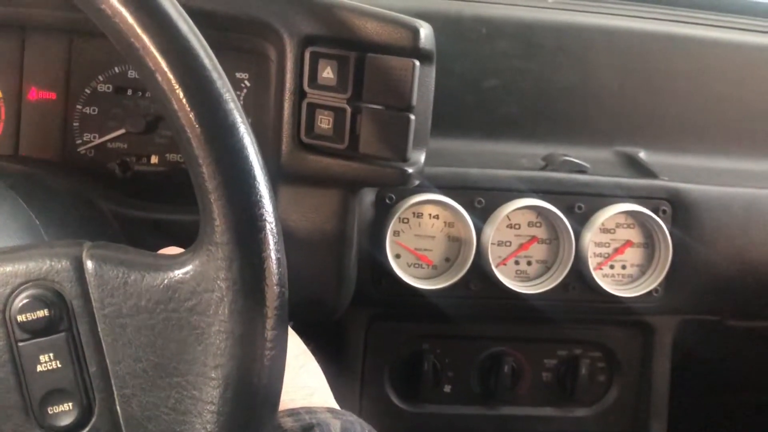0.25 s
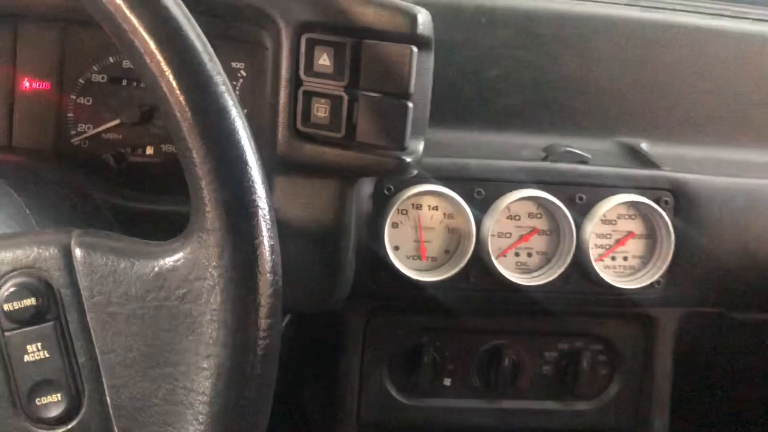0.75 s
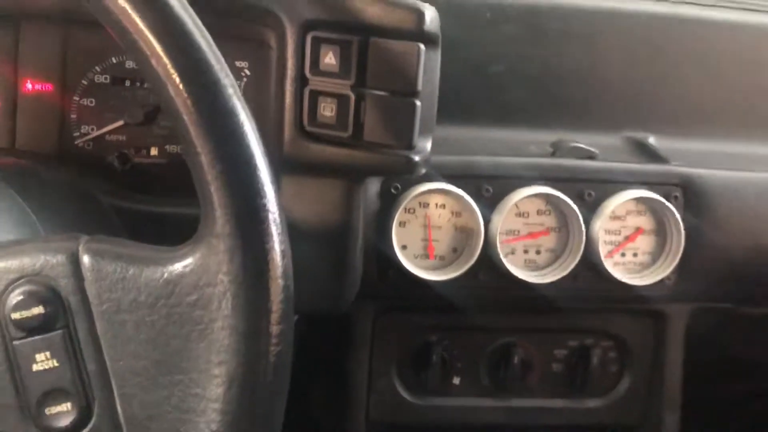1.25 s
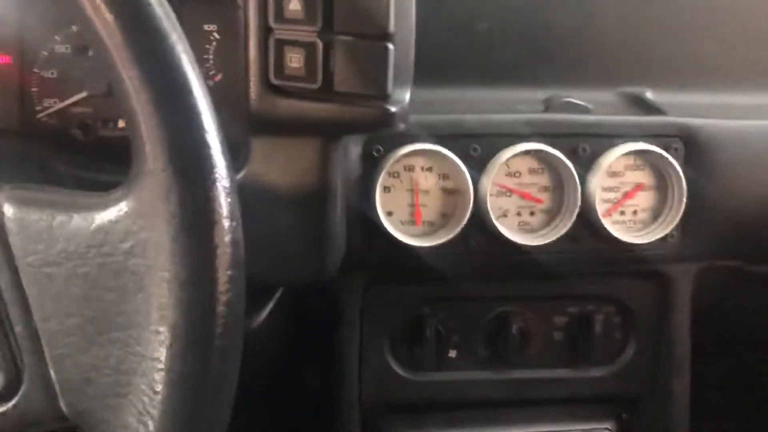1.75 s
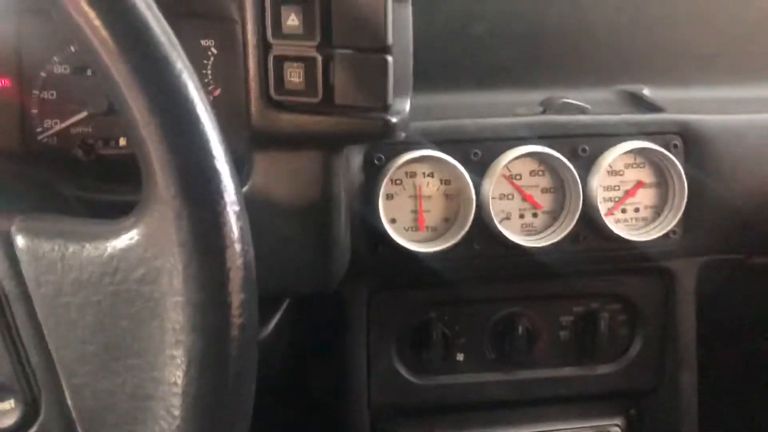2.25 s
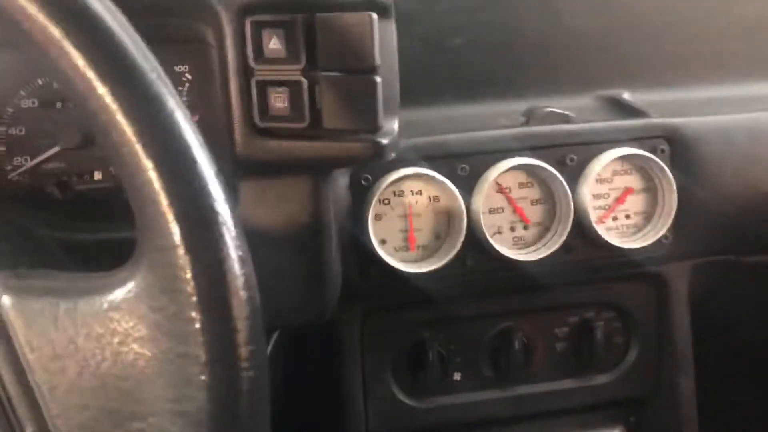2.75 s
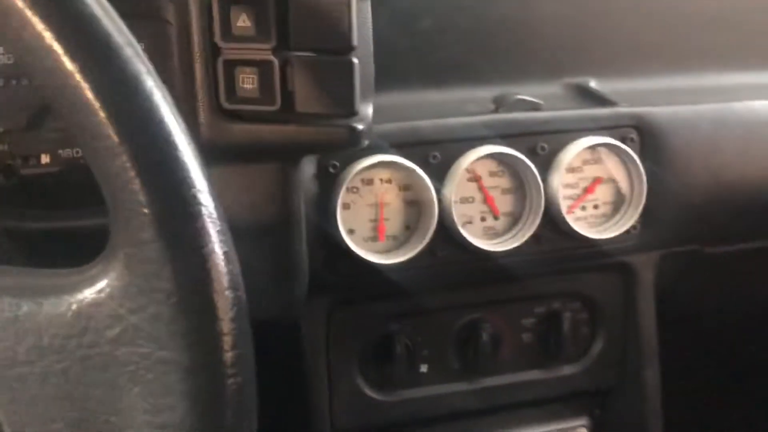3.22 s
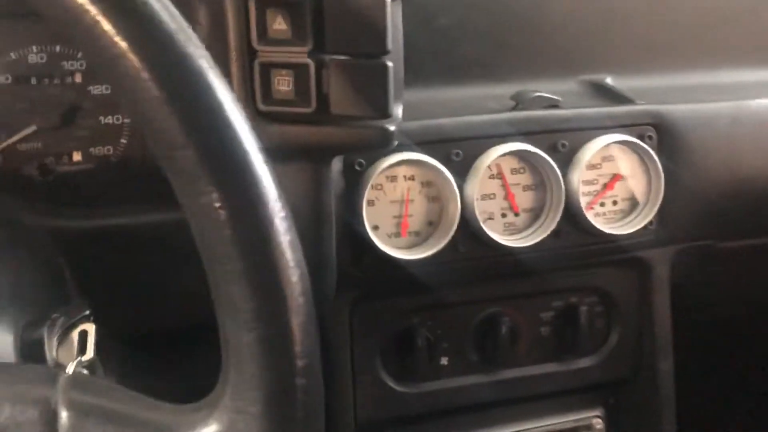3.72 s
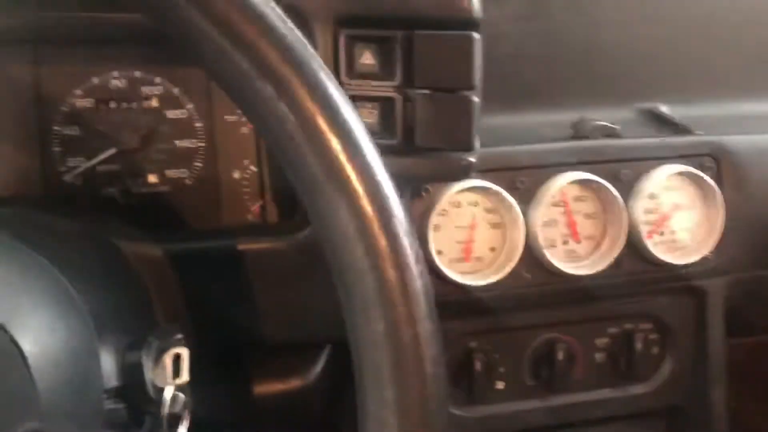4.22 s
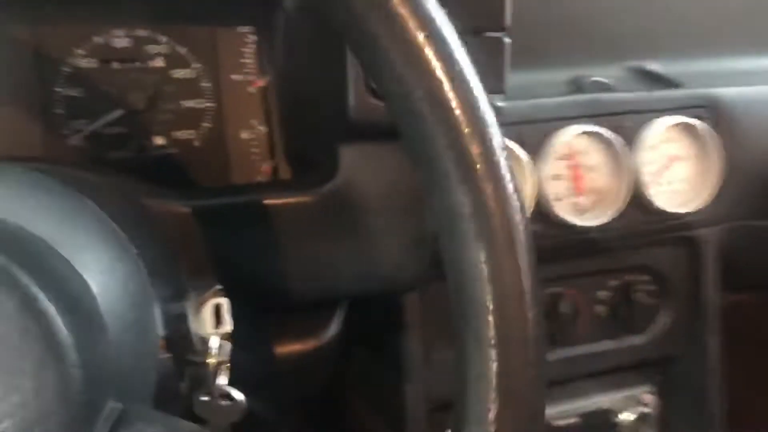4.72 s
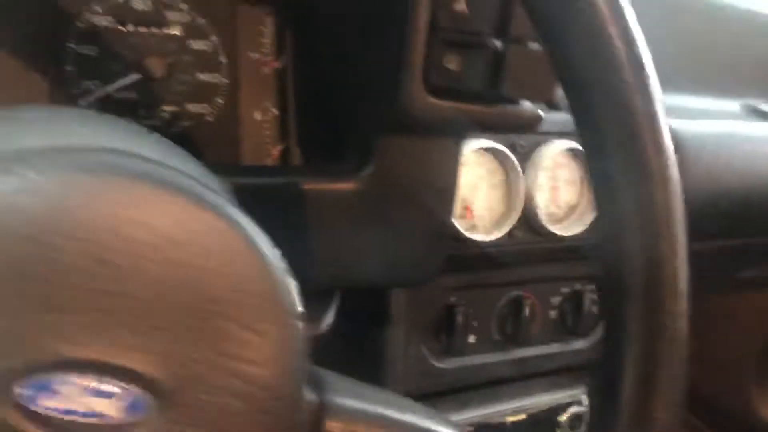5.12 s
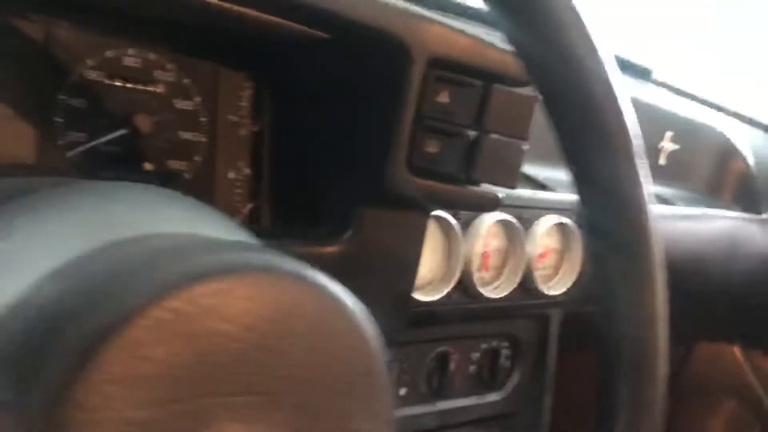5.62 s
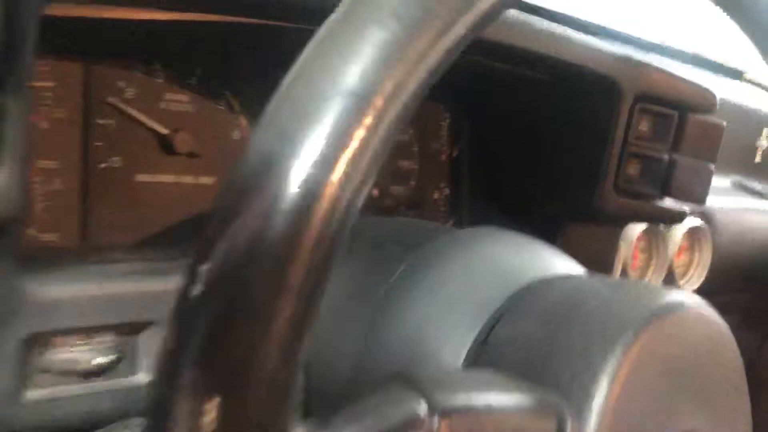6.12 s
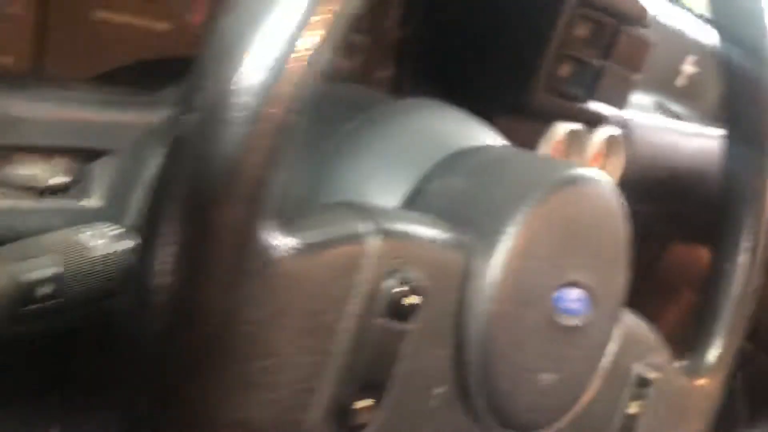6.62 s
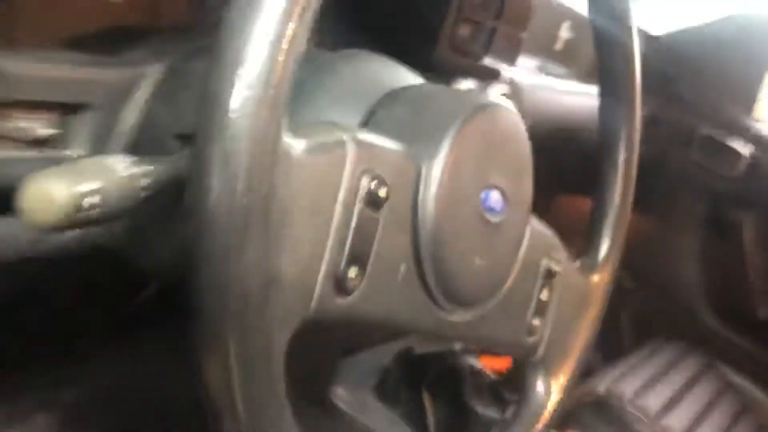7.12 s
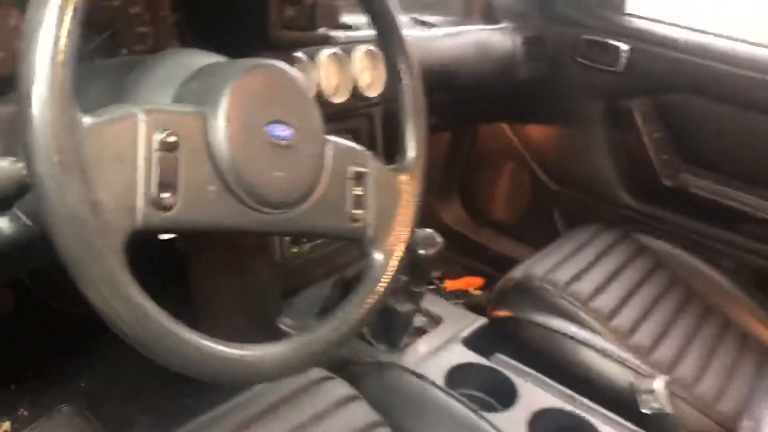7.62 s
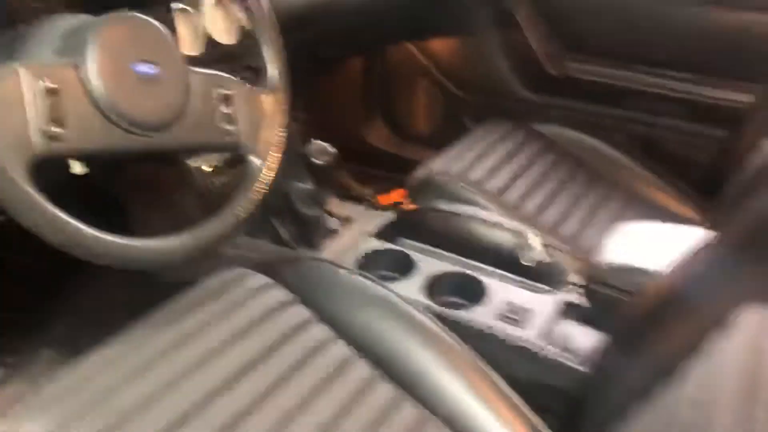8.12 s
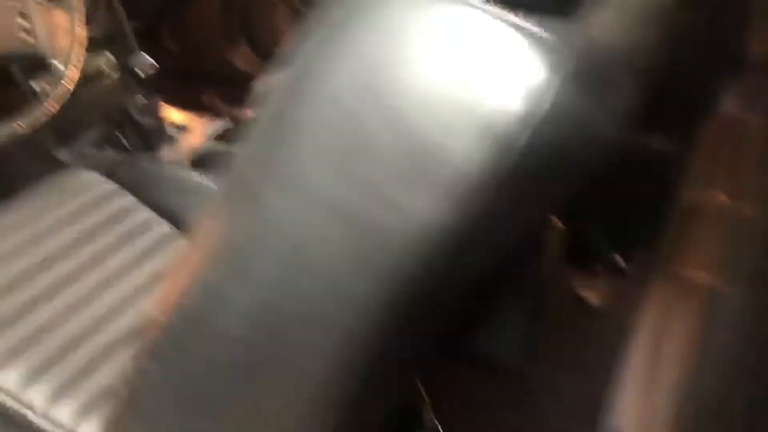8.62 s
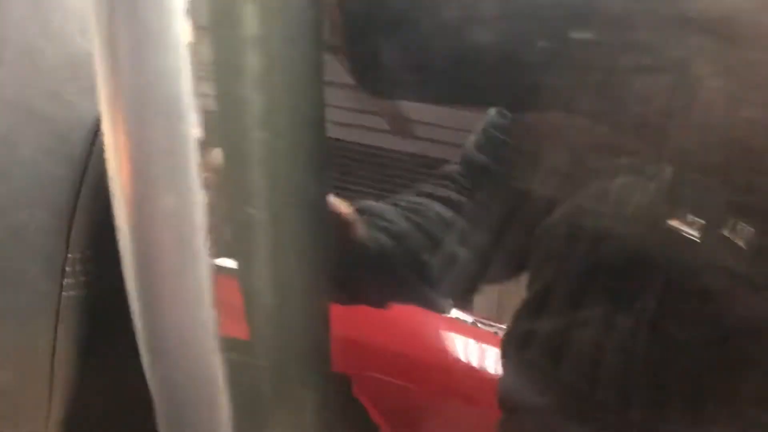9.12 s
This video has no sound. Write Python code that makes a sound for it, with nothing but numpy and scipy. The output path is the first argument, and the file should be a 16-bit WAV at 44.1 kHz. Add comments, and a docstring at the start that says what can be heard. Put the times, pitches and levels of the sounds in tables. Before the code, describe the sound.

Heard from the driver's seat in a garage: a very short starter whine and gear grind, then a V8 catches with rough explosions, flares loudly and falls to a throbbing open-exhaust idle. Engine ticks and hisses. Keys clink once, trim knocks, and the boom swells as the handheld microphone backs out of the door, with soft bumps and cloth rustle; the idle sags at the end.

```python
"""In a garage, a cold V8 with an open exhaust is started, heard from the driver's seat.
The starter motor hums and whines, then the engine catches, flares up and settles into a loping idle.
The keys clink once, then the listener backs out through the open door, past standing waves of the note.
The exhaust mixes a steady note with uneven firings that ring in resonances; the engine bay ticks and hisses.
Loose trim knocks, the body bumps softly and clothes rustle: short bursts of shaped noise."""
import sys
import numpy as np
from scipy import signal
from scipy.fft import rfft, irfft
from scipy.io import wavfile
from scipy.ndimage import uniform_filter1d

SR = 44100
rng = np.random.default_rng(int(sys.argv[2]) if len(sys.argv) > 2 else 0)


def store_pcm(level_fs):
    """Save levels as 16-bit WAV."""
    pcm = np.round(np.clip(level_fs, -1, 1) * 32767).astype(np.int16)
    wavfile.write(sys.argv[1], SR, np.atleast_2d(pcm).T)


N = 412335
TIME = np.arange(N) / SR  # s


def from_db(db):
    """Turns decibels into a factor on the sound pressure."""
    return 10 ** (np.asarray(db) / 20)


def rms_one(x):
    """Scales a sound to an average strength (rms) of 1."""
    return x / np.sqrt(np.mean(x ** 2) + 1e-20)


def in_time(rows):
    """Joins the points of each column by straight lines, giving one curve per column."""
    s, *columns = np.transpose(rows)
    return [np.interp(TIME, s, column) for column in columns]


def evened(x, size=3400):
    """Holds the rms near 1 over a window of size samples; faster throbs stay."""
    power = uniform_filter1d(x ** 2, size=2 * size)
    power = uniform_filter1d(power, size=size)
    return x / np.sqrt(np.abs(power) + 1e-12)


def blend(a, b, share):
    """Mixes a with the given share (0-1) of the power of b."""
    share = np.clip(share, 0, 1)
    return np.sqrt(1 - share) * a + np.sqrt(share) * b


def cut(x, hz, kind, order=4):
    """Removes the pitches outside the wanted range with a smooth filter."""
    return signal.sosfilt(signal.butter(order, hz, kind, fs=SR, output="sos"), x)


def drift(rate):
    """Slow random wandering with spread 1, aiming for rate new values per second."""
    knots = rng.standard_normal(4000)
    return rms_one(np.interp(TIME * rate, np.arange(len(knots)), knots))


def coloured(x, spectrum):
    """Shapes a sound by (pitch_hz, level_db) points, falling steeply below the first; rms 1."""
    hz, db = np.transpose(spectrum)
    f = np.arange(N // 2 + 1) * SR / N + 1
    gain = from_db(np.interp(np.log(f), np.log(hz), db))
    gain = gain * np.minimum(f / hz[0], 1) ** 4
    return rms_one(irfft(rfft(x) * gain, N))


def resonate(x, modes):
    """Lets a sound ring in side-by-side resonances (pitch_hz, width_hz, level_db) of alternating sign."""
    out = 0
    for k, (hz, width, db) in enumerate(modes):
        r = np.exp(-np.pi * width / SR)  # a wider resonance dies sooner
        poles = [1, -2 * r * np.cos(2 * np.pi * hz / SR), r * r]
        ringing = signal.lfilter([1, 0, -1], poles, x + 1e-18)
        out = out + (-1) ** k * from_db(db) * (1 - r * r) / 2 * ringing
    return out


def narrow(x, hz, width):
    """Passes one resonance twice, for steep flanks and dark valleys."""
    mode = [(hz, width, 0)]
    return resonate(resonate(x, mode), mode)


def garage(x, t60, wet_db):
    """Adds a dense tail of reflections that falls 60 dB in t60 seconds, cut off after half a second."""
    t = TIME[:SR // 2]
    tail = rng.standard_normal(len(t)) * from_db(-60 * t / t60)
    reflections = signal.fftconvolve(x, tail / np.linalg.norm(tail))[:N]
    return x + from_db(wet_db) * reflections


def bursts(events, spectrum):
    """Bursts of shaped noise that start suddenly and die away: (start_s, level_db, decay_s)."""
    envelope = 0
    for s, db, decay in events:
        envelope = envelope + from_db(db) * (TIME >= s) * np.exp(-np.abs(TIME - s) / decay)
    return envelope * coloured(rng.standard_normal(N), spectrum)


def ramp(start_s, length_s):
    """Rises from 0 to 1 and stays there."""
    return np.clip((TIME - start_s) / length_s, 0, 1)


# Where the listener is: time_s, place (0 at the gauges, 1 at the wheel, 2 in the doorway, 3 by the sill)
LISTENER_PLACE = [(0, 0), (3.4, 0), (4.2, 1), (4.9, 1.1), (5.6, 2), (7.0, 2), (8.0, 3), (8.7, 2.8),
                  (9.35, 2)]


def nearness(count=4):
    """Weight (0-1) of each of the four listening places over time."""
    place = np.clip(in_time(LISTENER_PLACE)[0], 0, count - 1)
    return np.maximum(1 - np.abs(place - np.arange(count)[:, None]), 0)


# Engine speed: time_s, firings_per_s
ENGINE_SPEED = [(0, 12), (.2, 90), (.45, 159), (.54, 163), (.63, 158), (.76, 128), (.95, 113), (1.2, 106.9),
                (1.85, 107.7), (2.12, 102), (2.45, 106.5), (2.68, 105.9), (2.85, 104.7), (3.2, 106.5),
                (3.75, 104.9), (4.3, 105.5), (4.95, 107.6), (5.3, 102.7), (5.7, 100.3), (6.15, 101.5),
                (6.6, 100.3), (7.8, 98), (8.3, 95.5), (8.8, 91.7), (9.05, 80.5), (9.35, 72.4)]
IDLE_HZ = 107.2  # firings per s at fast idle
CRANK_WOBBLE = .003  # spread in cycles


def engine_speed():
    """Firings per second over time."""
    return in_time(ENGINE_SPEED)[0]


def revs():
    """Firings per second above fast idle, never below 0."""
    return np.maximum(engine_speed() - IDLE_HZ, 0)


def crank():
    """Counts four-stroke cycles; the crank runs a little ahead or behind."""
    cycle = np.cumsum(engine_speed()) / SR / len(CYLINDERS)
    return cycle + CRANK_WOBBLE * drift(9)


# Cylinders in firing order, before they are evened out: strength_db, lateness_firing_gaps
CYLINDERS = [(3, 0), (-7, .1), (3.5, -.08), (1, 0.1153), (-1.5, 0.031), (5, -0.0997), (0, 0.0907),
             (4, -0.0718)]
LOPE_LOSS_PER_HZ = 0.0062  # unevenness lost per firing per s above idle


def firings(cycle, spread_db, jitter, unlike=1):
    """One click per firing, with each cylinder's own strength and lateness plus chance; more alike at speed."""
    number = np.arange(int(cycle[-1] * len(CYLINDERS)))
    firing_revs = np.interp(number / len(CYLINDERS), cycle, revs())
    uneven = np.clip(1 - LOPE_LOSS_PER_HZ * firing_revs, 0, 1)
    strength_db, late = unlike * np.array(CYLINDERS)[number % len(CYLINDERS)].T
    chance = rng.standard_normal((2000, 2))[:len(number)]
    moved = number + uneven * (late + jitter * chance[:, 0])
    sample = np.interp(moved / len(CYLINDERS), cycle, np.arange(N)).astype(int)
    click_db = uneven * (strength_db + spread_db * chance[:, 1])
    return np.bincount(sample, from_db(click_db), N)


def puffs(clicks, decay_s):
    """Each click lets out a short puff of turbulent gas: noise that dies away."""
    envelope = signal.lfilter([1], [1, -np.exp(-1 / (decay_s * SR))], clicks)
    return rms_one(envelope * rng.standard_normal(N))


# Starter whine: pitch_hz, width_hz, level_db
STARTER_WHINE = [(260, 23, -2), (1210, 40, -23), (1300, 48, -26), (1500, 23, 1), (1880, 62, -7),
                 (1920, 64, -27)]
WHINE_DB, RUN_DOWN_DB_PER_S = -37.5, 32
DROP_OUT_S, DROP_OUT_FOR_S = 0.4, 0.28  # when the gear drops out, and its decay


def starter():
    """Hum of the motor and whine of its gear teeth: noise in narrow resonances, dying after drop-out."""
    whine_db = WHINE_DB - RUN_DOWN_DB_PER_S * np.maximum(TIME - DROP_OUT_S, 0)
    whine = 0
    for hz, width, db in STARTER_WHINE:
        whine = whine + from_db(db) * rms_one(narrow(rng.standard_normal(N), hz, width))
    return from_db(whine_db) * whine


def engaged():
    """1 while the starter gear is in mesh, dying away after it drops out."""
    return np.exp(-np.maximum(TIME - DROP_OUT_S, 0) / DROP_OUT_FOR_S)


# Base level of the engine bay along the listener's way: time_s, level_db
BAY_LEVEL = [(1.0, -39.5), (1.25, -37.5), (2.21, -36.5), (2.89, -37), (4.83, -36.5), (7.01, -32),
             (8.4, -36), (8.8, -38.5), (8.98, -42.5), (9.2, -44.5), (9.35, -38.5)]
SPIN_UP_S = 0.042  # the starter spins up


def bay_db(standstill_db, grind_db, db_per_hz, cranking_db=-3.5):
    """Engine bay level: rises at spin-up, jumps at the first explosion, then gains from gear or speed."""
    before = standstill_db * (1 - ramp(0, SPIN_UP_S)) + cranking_db * (TIME < BANGS[0][0])
    extra = np.maximum(grind_db * engaged(), db_per_hz * revs())
    return in_time(BAY_LEVEL)[0] + before + extra


# Loose metal that rattles: pitch_hz, width_hz, level_db
RATTLING_PARTS = [(1160, 15, 17.5), (2208, 18, 13), (2437, 21, 7), (3604, 75, -3), (4150, 48, 2),
                  (4627, 41, 5), (5090, 130, -1.5), (7080, 38, -1.5)]


def rattle(per_s, size_db):
    """Each loose part is knocked at random moments, some knocks much harder than others."""
    out = 0
    for mode in RATTLING_PARTS:
        hits = rng.random(N) < per_s / SR
        size = from_db(size_db * np.clip(rng.standard_normal(N), -2, 2))
        out = out + resonate(hits * size, [mode])
    return rms_one(out)


def patchy(x, patchy_db, count=16):
    """Each of the neighbouring pitch bands, about a quarter octave apart, swells and fades on its own."""
    spectrum, octave = rfft(x), np.log2(np.arange(N // 2 + 1) * SR / N + 1)
    centres = np.log2(np.geomspace(1000, 14000, count))
    out = 0
    for band in np.eye(count):
        part = irfft(spectrum * np.interp(octave, centres, band), N)
        out = out + part * from_db(patchy_db * drift(60))
    return out


# Colour of the clatter and hiss in the engine bay: pitch_hz, level_db
BAY_COLOUR = [(950, -15), (1180, -3), (1400, -1), (1550, -1.5), (1900, -4.5), (2250, -6), (2850, -9.5),
              (3600, -10), (4700, -10), (6000, -12), (8500, -15.5), (15800, -16)]
# Colour of the grinding starter gear, also used for the first explosions: pitch_hz, level_db
GRIND_COLOUR = [(900, 4.5), (1550, 2), (1970, -2), (2390, -1), (3600, -6.5), (4630, -2), (5600, -5.5),
                (7770, -6.5), (15800, -15)]
GRIND_SHARE = 0.42  # share of the power while the gear is in mesh
CLATTER_DB, HISS_DB = -4, -3.5  # relative to the engine bay level


def engine_bay(cycle, split_hz=3000):
    """Valves tick and gas spits at every firing over the fan's rush; the starter gear grinds at first."""
    clatter_db = CLATTER_DB + bay_db(standstill_db=-11.0, grind_db=15.5, db_per_hz=0.2625)
    hiss_db = HISS_DB + bay_db(standstill_db=-20, grind_db=19.0, db_per_hz=0.1768)
    ticks = firings(cycle, spread_db=1.8, jitter=.01)
    valve = np.round(cycle * len(CYLINDERS)) % 4
    # each of the four valve groups has its own ring
    tapping = rms_one(sum(garage(ticks * (valve == k), t60=0.18, wet_db=42) for k in range(4)))
    rush = blend(rng.standard_normal(N), puffs(ticks, decay_s=0.014), share=0.26)
    running = coloured(blend(rush, tapping, share=0.45), BAY_COLOUR)
    running = blend(running, rattle(per_s=60, size_db=5), share=0.13)
    strokes = puffs(firings(cycle, spread_db=3, jitter=.15), decay_s=.016)
    grinding = coloured(strokes, GRIND_COLOUR)
    mixed = blend(running, evened(grinding), GRIND_SHARE * engaged())
    noise = patchy(mixed, patchy_db=1.6)
    clatter = evened(cut(noise, split_hz, "low"))
    hiss = evened(cut(noise, split_hz, "high"))
    return from_db(clatter_db) * clatter + from_db(hiss_db) * hiss


# The engine catches, pulls hard, then the load eases off
CATCH_S, LOAD_RISE_S, EASE_S, EASE_FOR_S = 0.081, 0.069, 0.42, 0.7


def load():
    """How hard the engine pulls (0-1): attack, hold and release of the start-up flare."""
    return ramp(CATCH_S, LOAD_RISE_S) * (1 - ramp(EASE_S, EASE_FOR_S))


# The exhaust briefly slackens: centre_s, level_db, half_length_s
SLACKS = [(1.04, -2, 0.051), (7.86, -3.5, .016)]


def effort_db(cranking_db, rise_s, flare_db, db_per_hz, late_s=0, standstill_db=-9):
    """Change of exhaust level: faint until the engine catches, then shaped by load, speed and brief slacks."""
    before = standstill_db * (1 - ramp(0, SPIN_UP_S))
    before = before + cranking_db * (1 - ramp(CATCH_S + late_s, rise_s))
    slack = sum(db * np.exp(-((TIME - s) / half) ** 2) for s, db, half in SLACKS)
    return before + flare_db * load() + db_per_hz * revs() + slack


# Cold cylinders settle into even burning; the bark turns uneven again when the speed sags
SETTLE_S, SETTLE_FOR_S = 1.3, 0.94
STUMBLE_HZ, STUMBLE_RANGE_HZ = 93.6, 17.5  # firings per s
BOOM_UNEVEN, BARK_UNEVEN, LEAST_UNEVEN = 0.16, 0.14, .006  # shares 0-1; the last is always in the boom
# Above this level the standing wave favours the steady note
QUIET_BOOM_DB, EVENING_PER_DB = -13.5, .6


def unevenness(boom_db):
    """Uneven shares of boom and bark: high while cold; the bark also stumbles at low speed."""
    cold = 1 - ramp(SETTLE_S, SETTLE_FOR_S)
    stumble = np.clip((STUMBLE_HZ - engine_speed()) / STUMBLE_RANGE_HZ, 0, 1)
    above_quiet = np.maximum(boom_db - QUIET_BOOM_DB, 0)
    settled = LEAST_UNEVEN + BOOM_UNEVEN * np.exp(-EVENING_PER_DB * above_quiet)
    boom_uneven = cold + (1 - cold) * settled
    bark_uneven = BARK_UNEVEN + (1 - BARK_UNEVEN) * np.maximum(cold, stumble)
    return boom_uneven, bark_uneven


# Steady note, one row per multiple of the four-stroke cycle from the third up:
# gauges_db, wheel_db, doorway_db, sill_db
NOTE_ORDERS = [(-30, -37, -49, -50), (-31, -29, -39, -53), (-5, -13, -25, -28), (-16, -18, -30, -34),
               (-24, -17, -34, -34), (0, 0, 0, 0), (-7, -7, -17, -23), (-11, -14, -12, -23),
               (-4, -7, -16, -17), (-22, -27, -29, -38), (-22, -25, -31, -32), (-30, -35, -38, -47),
               (-33, -36, -38, -37), (-20, -31, -23, -38), (-22, -22, -37, -38), (-25, -25, -31, -52),
               (-11, -20, -29, -44), (-24, -25, -31, -44), (-11, -14, -22, -22), (-31, -26, -20, -30),
               (-24, -20, -24, -35), (-31, -22, -21, -16), (-27, -29, -25, -26), (-25, -28, -35, -27),
               (-24, -29, -38, -26), (-31, -34, -39, -26), (-26, -31, -28, -35), (-32, -36, -35, -35)]


def exhaust_note(cycle, size=128, order=3):
    """One thump per cycle rings on in the pipes; reflections, drawn as random phases, spread its upper orders."""
    multiples = order + np.arange(len(NOTE_ORDERS))
    turn = np.linspace(0, 1, 2048)
    every = np.arange(size // 2 + 1)
    scatter = .9 * rng.standard_normal(len(every)) * (every > 21)
    out = 0
    for near, levels_db in zip(nearness(), np.transpose(NOTE_ORDERS)):
        log_gain = np.log(from_db(np.interp(every, multiples, levels_db)))
        # minimum phase: the energy comes as early as the levels allow
        early = irfft(log_gain) * (np.arange(size) < size // 2)
        phase = 2 * rfft(early).imag + scatter
        wave = 0
        for m, db in zip(multiples, levels_db):
            wave = wave + from_db(db) * np.cos(2 * np.pi * m * turn + phase[m])
        out = out + near * np.interp(cycle % 1, turn, wave)
    return out


# Swing of the boom through one cycle before scaling by place and load, one per cylinder: level_db
LOPE_SWING = [-1, 2, 1.5, 1, -3, -0.5, 2.7, -0.5]
# How much of the swing is heard, before scaling by load: share at each of the four places
LOPE_SHARE = [0.52, 0.31, 0.14, 0.13]
LOPE_CHANCE_DB = 1.0  # no two thumps are alike; spread before the same scaling


def lope(cycle):
    """The boom's strength sways through each cycle: strong thumps, weaker beats and a lull."""
    swing = np.append(LOPE_SWING, LOPE_SWING[0])
    swing_db = np.interp(cycle % 1 * len(LOPE_SWING), np.arange(len(swing)), swing)
    heard = (np.array(LOPE_SHARE) @ nearness()) * (1.5 - load())
    return from_db((swing_db + LOPE_CHANCE_DB * drift(26)) * heard)


# Upper resonances of pipes and garage: pitch_hz, width_hz, gauges_db, wheel_db, doorway_db, sill_db
RASP_MODES = [(430.6, 78, 2, -34, 4.5, 3.5), (495, 58.5, 7.5, 6.5, 5.5, -3), (534.6, 49, 4, -11, 0.5, -10),
              (647.5, 142, 1.5, -3, 0, -0.5), (705, 130, -3, -6, -3.5, -2), (810, 150, -1, -3, -3, -2),
              (1010, 102, -23, -8, -8, -3.5), (1159, 180, -22, -26, -5, -6)]
SWELL_DB, SWELLS_PER_S = 2, 3


def rasp(pulses):
    """Upper resonances whose levels depend on the listener's place and swell with small head movements."""
    near = nearness()
    out = 0
    for hz, width, *places_db in RASP_MODES:
        swell = from_db(SWELL_DB * drift(SWELLS_PER_S))
        out = out + (from_db(places_db) @ near) * swell * narrow(pulses, hz, width)
    return out


# Standing waves along the listener's way, before the engine's effort: time_s, boom_db, bark_db
STANDING_WAVES = [(1.3, -15, -26.5), (3.5, -15.5, -25), (4.2, -13, -24.5), (5.3, -11.5, -24.5),
                  (6.1, -11, -23.5), (7.0, -8, -22.5), (7.65, -7.5, -25.5), (8.1, -7.5, -21),
                  (8.6, -8.5, -19.5), (9.08, -17.5, -24.5), (9.35, -12.5, -28)]
# Rasp relative to the base engine bay level, before effort: level_db at each of the four places
RASP_LEVEL = [5.4, 6.4, 6.56, 6.1]
# Lowest drone's share of the uneven boom when the engine is not pulling: share at each of the four places
DRONE_SHARE = [0.41, 0.47, 0.31, 0.057]
# Resonance of pipes and cabin: pitch_hz, width_hz, level_db
DRONE_MODES = [(64.3, 6.9, 6)]
# Low resonances of pipes, garage and cabin: pitch_hz, width_hz, level_db
BOOM_MODES = [(92.4, 80, 4), (135.5, 27.6, 7.5), (158, 22.3, -1.5)]
# Middle resonances of pipes, garage and cabin: pitch_hz, width_hz, level_db
BARK_MODES = [(213, 42, -8), (252.4, 14.3, 4.5), (275.4, 31, 1), (327, 15, 0.5), (394, 140, -11)]


def exhaust(cycle):
    """Boom, bark and rasp: the steady note mixed with uneven firings that ring in resonances."""
    idle_boom_db, idle_bark_db = in_time(STANDING_WAVES)
    boom_db = idle_boom_db + effort_db(cranking_db=-18.0, rise_s=0.058, flare_db=3.5,
                                       db_per_hz=0.01, late_s=0.038)
    bark_db = idle_bark_db + effort_db(cranking_db=-16, rise_s=0.029, flare_db=2.0,
                                       db_per_hz=-0.06, late_s=.02)
    rasp_db = in_time(BAY_LEVEL)[0] + np.array(RASP_LEVEL) @ nearness()
    rasp_db = rasp_db + effort_db(cranking_db=-5.5, rise_s=0.018, flare_db=10.5, db_per_hz=0.0)
    boom_uneven, bark_uneven = unevenness(idle_boom_db)
    drone_share = np.array(DRONE_SHARE) @ nearness() * (1 - load())
    note = exhaust_note(cycle)
    low_note = signal.sosfiltfilt(signal.butter(4, 190, fs=SR, output="sos"), note)
    # cold cylinders burn unevenly and shake the low resonances
    lumpy = firings(cycle, spread_db=3.5, jitter=.14)
    drone = cut(cut(resonate(lumpy, DRONE_MODES), 43.5, "high"), 63, "low")
    ringing = cut(cut(resonate(lumpy, BOOM_MODES), 69, "high"), 228, "low")
    uneven_boom = blend(evened(ringing, size=1100), evened(drone), drone_share)
    boom = lope(cycle) * blend(evened(low_note), uneven_boom, boom_uneven)
    # the sharp front of each firing carries a puff of turbulence
    sharp = firings(cycle, spread_db=2.0, jitter=.014)
    gas = blend(rms_one(sharp), puffs(sharp, decay_s=.004), share=.27)
    barking = resonate(garage(gas, t60=0.46, wet_db=0.0), BARK_MODES)
    barking = cut(cut(barking, 236, "high"), 368, "low")
    bark = blend(evened(note - low_note), evened(barking), bark_uneven)
    # higher up the cylinders sound more alike and merge into a growl
    fronts = firings(cycle, spread_db=1.5, jitter=.02, unlike=.4)
    growl = blend(rms_one(fronts), puffs(fronts, decay_s=.008), share=.55)
    raspy = rasp(garage(growl, t60=0.049, wet_db=-2.0))
    return from_db(boom_db) * evened(boom) + from_db(bark_db) * evened(bark) + from_db(rasp_db) * evened(raspy)


def swept_orders(cycle, orders, modes, flutter_db, flutter_per_s, stray):
    """Multiples of the cycle swell as speed carries them through resonances; uneven burning makes them waver."""
    cycle_hz, grid = engine_speed() / len(CYLINDERS), np.arange(1000)
    response = sum(from_db(db) / (1 + (2 * (grid - hz) / width) ** 2) for hz, width, db in modes)
    out = 0
    for m, db in orders:
        level = from_db(db + flutter_db * drift(flutter_per_s)) * np.interp(m * cycle_hz, grid, response)
        turns = round(m) * cycle + rng.random() + stray * drift(flutter_per_s)
        out = out + level * np.cos(2 * np.pi * turns)
    return out


# Orders that sing in the flare: multiple_of_cycle, level_db
FLARE_ORDERS = [(4, -6), (6, 2.5), (8, -4), (13, 4), (16, 3), (19, -9.5), (26, -5)]
# Resonances they sweep through: pitch_hz, width_hz, level_db
FLARE_MODES = [(63, 20, -15), (117, 39, -22), (157, 25, -19.5), (234, 22, -20), (324, 26, -21),
               (380, 80, -20.5), (498, 100, -20)]
FLARE_END_S, FLARE_FADE_S = 0.777, 0.21
# Orders that howl at idle: multiple_of_cycle, level_db
HOWL_ORDERS = [(36, 11.5), (37, 10.5), (38, -15), (40, 3), (41, 5.5), (42, -5.5), (43, 2), (44, 8)]
# Resonances of the howl: pitch_hz, width_hz, level_db
HOWL_MODES = [(510, 45, -0.5), (555, 70, -8.5)]
# Level of the howl: time_s, level_db
HOWL_LEVEL = [(.9, -50.5), (2.2, -43.5), (4.7, -46), (5.3, -36.5), (6.5, -33.5), (7.4, -43.5), (8.3, -48)]


def singing(cycle):
    """The pipes sing roughly as the revs flare and fall, then howl softly at idle."""
    idling = ramp(FLARE_END_S, FLARE_FADE_S)
    flare = swept_orders(cycle, FLARE_ORDERS, FLARE_MODES, flutter_db=2.5, flutter_per_s=55, stray=.1)
    howl = swept_orders(cycle, HOWL_ORDERS, HOWL_MODES, flutter_db=2.5, flutter_per_s=12, stray=.1)
    howl_level = from_db(in_time(HOWL_LEVEL)[0])
    return ramp(CATCH_S, LOAD_RISE_S) * (1 - idling) * flare + idling * howl_level * howl


# Hard firings of the cold engine: start_s, thud_db, bark_db
CHUGS = [(0.099, -8.5, -37), (0.136, -27, -12.5), (0.169, -9.5, -23.5), (.485, -30, -13.5),
         (0.666, -16, -24), (0.746, -12, -27), (.845, -20, -19), (0.908, -9, -10.5), (1.234, -21, -17.5),
         (1.305, -25, -22), (1.395, -28, -16)]
# Resonance of the thud: pitch_hz, width_hz, level_db
THUD_MODES = [(58, 9.9, 0)]


def chugs():
    """Single hard firings of the cold engine: each rings as a deep thud and a bark in the pipes."""
    s, *levels_db = np.transpose(CHUGS)
    click = 1.0 * (TIME[:SR // 2] == 0)
    out = 0
    for db, modes in zip(levels_db, (THUD_MODES, BARK_MODES)):
        band_hz = [.5 * modes[0][0], 1.3 * modes[-1][0]]
        ring = cut(resonate(click, modes), band_hz, "band", order=2)
        hits = np.bincount((s * SR).astype(int), from_db(db), N)
        out = out + signal.fftconvolve(hits, ring / np.abs(ring).max())[:N]
    return out


# First explosions in the pipes: start_s, level_db, decay_s
BANGS = [(.107, -14.5, 0.033), (.15, -18, .025), (.203, -17.5, 0.042), (.349, -25, .015),
         (.387, -20.5, 0.022), (.41, -22, 0.013), (.432, -20, 0.0067), (.505, -32, 0.013)]


def first_explosions():
    """The first explosions in the pipes burst out as noise with the colour of the grind."""
    return bursts(BANGS, GRIND_COLOUR)


ROAR_HZ, ROAR_WIDTH_HZ, ROAR_DB = 156, 34, -12.5
ROAR_S, ROAR_RISE_S, ROAR_FADE_S = .15, 0.083, 0.14


def roar(cycle):
    """While the engine pulls, the uneven firings ring hard in one pipe resonance."""
    swell = ramp(ROAR_S, ROAR_RISE_S) * (1 - ramp(EASE_S, ROAR_FADE_S))
    pulses = firings(cycle, spread_db=0.5, jitter=.2)
    return from_db(ROAR_DB) * swell * evened(narrow(pulses, ROAR_HZ, ROAR_WIDTH_HZ), size=900)


# Keys swinging against the column: start_s, level_db, decay_s
KEY_HITS = [(3.623, -25, 0.011), (3.631, -33, 0.012)]
# Colour of the clink: pitch_hz, level_db
KEY_COLOUR = [(1000, -2), (3000, -3), (6000, -1), (9000, -6), (15500, -13)]


def keys():
    """The keys swing against the column: two bright bursts so close that they make one clink."""
    return bursts(KEY_HITS, KEY_COLOUR)


# Loose trim knocks: start_s, level_db, decay_s
TRIM_KNOCKS = [(5.058, -32, 0.1), (5.12, -46, 0.04), (6.699, -39, 0.019)]
# Colour of the knocks: pitch_hz, level_db
KNOCK_COLOUR = [(1000, 9), (1700, -6), (2300, 12), (3000, -17), (6000, -4), (15500, -32)]


def trim_knocks():
    """Loose trim knocks: sudden noise bursts that die away."""
    return bursts(TRIM_KNOCKS, KNOCK_COLOUR)


# Soft bumps on the body while climbing out: start_s, level_db, decay_s
BODY_BUMPS = [(7.27, -25, 0.05), (8.77, -31, 0.041)]
# Colour of the bumps: pitch_hz, level_db
BUMP_COLOUR = [(60, -18), (150, 0), (290, 29), (450, 5), (900, -8), (3000, -53), (12000, -52)]


def body_bumps():
    """Soft bumps on the body while climbing out: dull noise bursts that die away."""
    return bursts(BODY_BUMPS, BUMP_COLOUR)


# Clothes brush the seat and door: centre_s, level_db, half_length_s
RUSTLES = [(8.627, -37, 0.025), (8.707, -36, .014), (8.876, -38, 0.077), (9.097, -35, 0.02),
           (9.302, -30.5, 0.013)]
# Colour of the cloth: pitch_hz, level_db
RUSTLE_COLOUR = [(1000, 17), (2200, 5), (3200, 1.5), (5000, 0), (9000, -6), (15500, -9)]


def rustles():
    """Short brushes of cloth: noise that swells and fades."""
    envelope = sum(from_db(db) / (1 + ((TIME - s) / half) ** 4) for s, db, half in RUSTLES)
    return envelope * coloured(rng.standard_normal(N), RUSTLE_COLOUR)


def scene():
    """Adds the starter, the engine and the small sounds of handling and cloth into one channel."""
    cycle = crank()
    engine = engine_bay(cycle) + exhaust(cycle) + singing(cycle)
    engine = engine + chugs() + first_explosions() + roar(cycle)
    handling = keys() + trim_knocks() + body_bumps() + rustles()
    return (starter() + engine + handling)[None]


CUTOFF_HZ = 15800


def record(dry, top=0.9):
    """Rounds the highest peaks and ends the treble steeply."""
    rounded = dry / (1 + (dry / top) ** 8) ** (1 / 8)
    return signal.sosfilt(signal.ellip(10, .1, 80, CUTOFF_HZ, fs=SR, output="sos"), rounded)


dry = scene()
out = record(dry)
store_pcm(out)
```